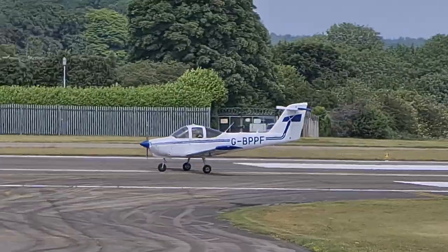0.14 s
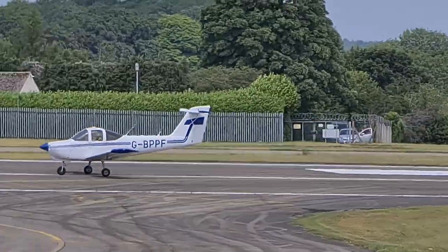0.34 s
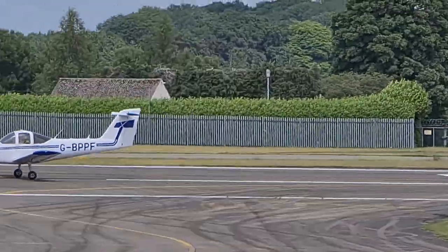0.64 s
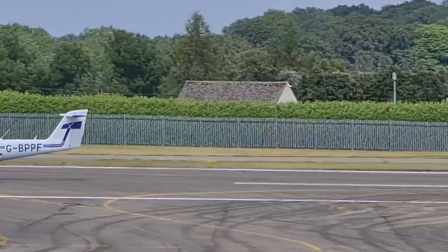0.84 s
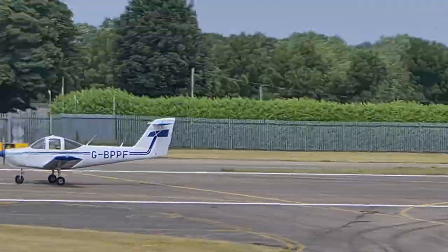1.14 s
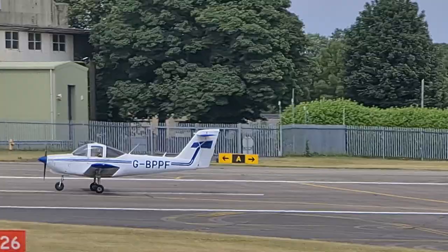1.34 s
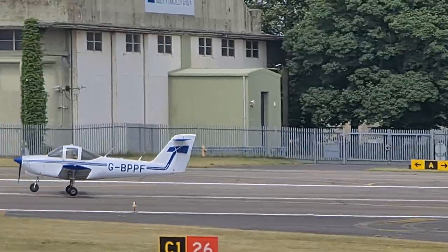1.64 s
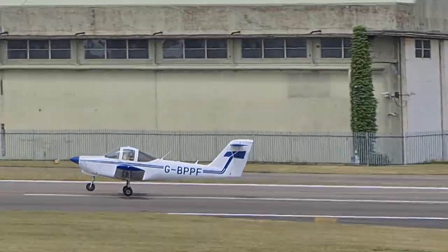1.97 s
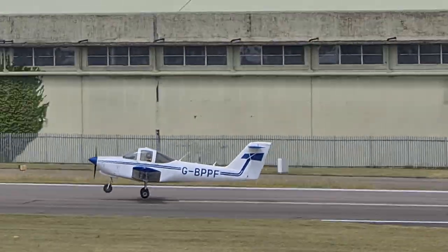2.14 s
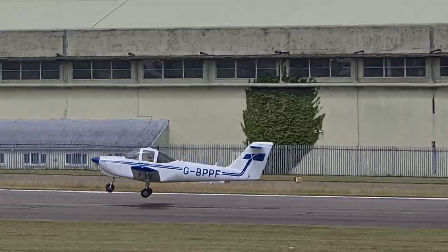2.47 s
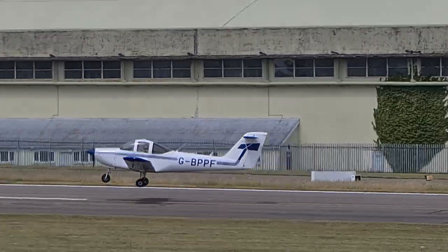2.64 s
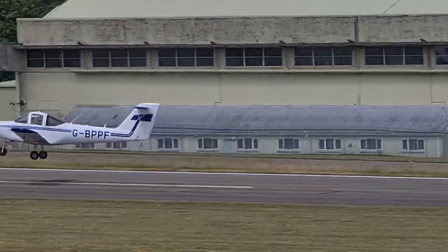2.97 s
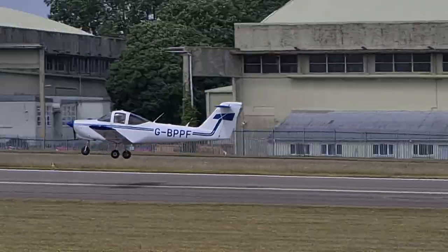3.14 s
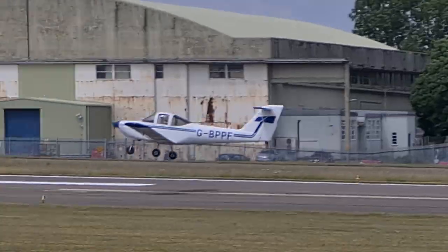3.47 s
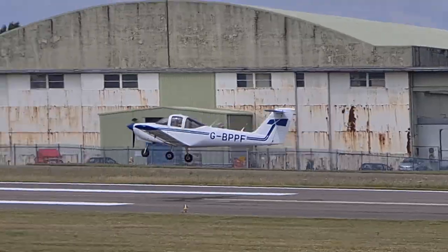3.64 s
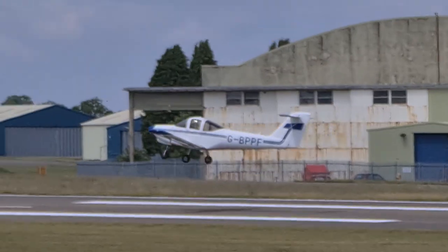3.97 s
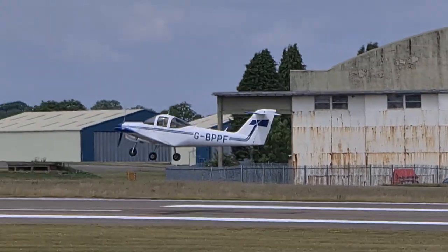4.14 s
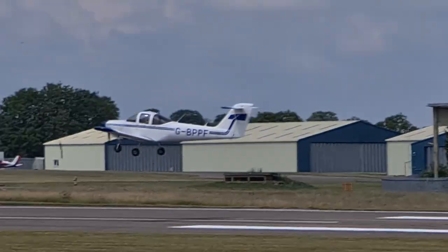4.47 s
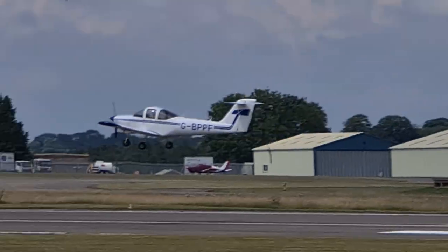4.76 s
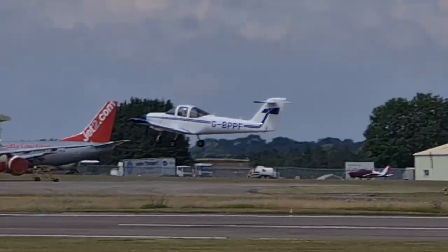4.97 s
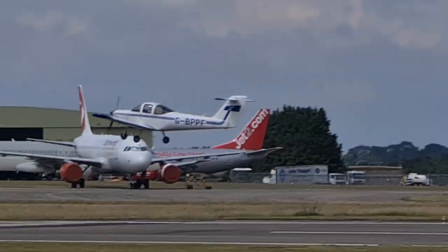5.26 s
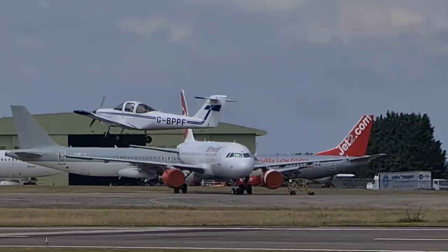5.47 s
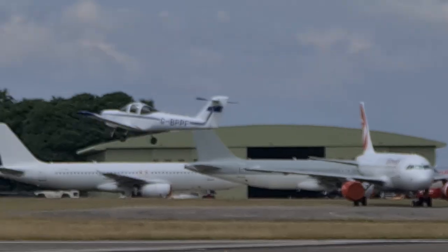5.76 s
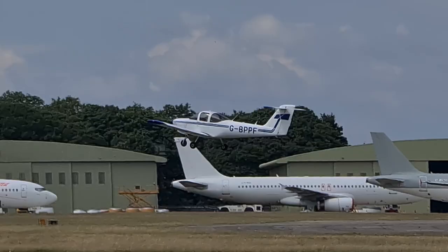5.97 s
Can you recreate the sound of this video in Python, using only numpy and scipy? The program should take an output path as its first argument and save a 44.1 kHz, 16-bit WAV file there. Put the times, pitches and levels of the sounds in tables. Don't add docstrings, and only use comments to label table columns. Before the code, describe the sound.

Across an open airfield, a small single-engine propeller plane passes at full power. Its low, fast-throbbing drone begins with an airy forward swish, fills out, then slides slightly down in pitch as the tail turns toward the listener. Broadband roar and puffing exhaust hiss grow. One outdoor microphone in the grass catches gusts and low thumps throughout, the hardest near the end, plus tiny handling ticks and a barely audible distant bird.

```python
import sys
import numpy as np
from scipy import signal
from scipy.io import wavfile

SR = 44100
rng = np.random.default_rng(int(sys.argv[2]) if len(sys.argv) > 2 else 0)


def master(y):
    cut = np.clip(np.atleast_2d(y).T, -1, 1)
    pcm = np.round(cut * 32767)
    wavfile.write(sys.argv[1], SR, pcm.astype(np.int16))


def volts_from_decibels(level):
    exponent = np.asarray(level, float) / 20
    return 10 ** exponent


N = 269010
TIME = np.arange(N) / SR

# start_s, gain_db
EXHAUST_OPENNESS = [(0, 4.5), (.42, 6), (.52, 3), (.8, 0), (1.25, 0.5), (1.45, -2), (2.55, -5), (3.15, -1),
                    (3.37, -6), (3.55, -1.5), (3.77, -4), (3.92, 1.5), (4.75, 3), (5.1, 5.5), (5.32, 6),
                    (5.4, 11.5), (5.7, 11), (5.9, 5.5)]


def rms_one(x):
    return x / np.sqrt(np.mean(x ** 2) + 1e-20)


def in_time(rows):
    s, *columns = np.transpose(rows)
    return [np.interp(TIME, s, c) for c in columns]


def bells(rows):
    return sum(height * np.exp(-((TIME - s) / length) ** 2) for s, length, height in rows)


def drift(rate):
    r = np.exp(-80 * np.pi * rate / SR)
    coarse = rng.standard_normal(N // 40 + 2002)
    slow = signal.lfilter([1], [1, -2 * r, r * r], coarse)[2000:]
    return np.interp(np.arange(N) / 40, np.arange(len(slow)), rms_one(slow))


def band(x, low_hz, high_hz, order=2):
    return signal.sosfilt(signal.butter(order, [low_hz, high_hz], "band", fs=SR, output="sos"), x)


def banded_noise(spectrum, shared_db, own_db, rate, tilt_db=0):
    hz, level_db = np.transpose(spectrum)
    edges = hz[0] * 2 ** np.arange(0, np.log2(hz[-1] / hz[0]) + .2, 1 / 3)
    white = rng.standard_normal((2, N + SR))
    together, out = drift(rate), 0
    for k, (low, high) in enumerate(zip(edges, edges[1:])):
        centre_db = np.interp(np.log(low * high) / 2, np.log(hz), level_db)
        centre_db = centre_db + tilt_db * np.log2(low / hz[2])
        flicker_db = shared_db * together + own_db * drift(rate)
        out = out + volts_from_decibels(centre_db + flicker_db) * band(white[k % 2], low, high)[SR:]
    return rms_one(out)


def propeller(phase):
    # start_s, level_db, sharpness_db
    blade_tone = [(0, -29.5, -8), (.25, -28.5, -4.5), (.6, -25, -4), (1.0, -23.5, 1), (1.5, -21, -2),
                  (1.9, -20.5, -5.5), (2.7, -20.5, -7), (3.5, -20, -11), (4.05, -19.7, -10),
                  (4.4, -21, -10), (5.3, -21.5, -8), (6.1, -23, -0.5)]
    # start_s, length_s, gain_db
    ground_echo = [
        (1.0, 0.1, 3),
        (3.05, 0.18, -3.5),
        (3.75, 0.33, 5),
        (5.1, 0.25, -10),
        (5.9, 0.31, -7.5),
    ]
    # multiple, level_db against the upper level, lag_rad
    upper_orders = [(3, 1, .9), (4, 0, .9), (5, -6, .6), (6, -12, -1.5), (1.5, -9, 0)]
    first_db, sharp_db = in_time(blade_tone)
    second_db = first_db - 11 + sharp_db + bells(ground_echo)
    upper_db = first_db - 21.5 + sharp_db
    out = volts_from_decibels(first_db + 0.13 * drift(2.7)) * np.cos(phase)
    out += volts_from_decibels(second_db + 0.36 * drift(7.5)) * np.cos(2 * phase - .6)
    for multiple, level_db, lag_rad in upper_orders:
        out += volts_from_decibels(upper_db + level_db + drift(5.5)) * np.cos(multiple * phase - lag_rad)
    return np.sqrt(2) * out


def exhaust(phase):
    # start_s, depth_db
    pulsing = [(0, .3), (1, .8), (2.2, 1.5), (2.8, 4.5), (4, 4), (5, 2.5), (6.1, 2.5)]
    # start_s, length_s, tilt_db_per_octave
    clearings = [
        (1.34, .035, 2.5),
        (2.07, .05, 3),
        (3.05, .03, 2),
        (3.2, .04, 7),
        (3.55, .05, 3),
        (3.78, .05, 3),
        (3.93, .04, 2),
        (5.12, .05, 4),
    ]
    # start_s, tilt_db_per_octave
    viewing_tilt = [(0, 1.5), (.45, 2.5), (1, -1), (2, 0.5), (3, -1.5), (4, -2), (5, -1), (5.5, -6.5),
                    (6.1, 2.5)]
    # start_s, share_above_edge_db, loss_under_edge_db
    top_share = [(0, -25, -4), (.43, -28.5, -6), (.5, -31.5, -10), (1.9, -34, -9.5), (2.3, -32, -3),
                 (2.8, -34, -11.5), (3.6, -35, -7), (4.42, -48.5, -4.5), (4.55, -29, -3), (5.1, -26, -5.5),
                 (5.7, -30, -4), (6.1, -23.5, -4)]
    # pitch_hz, level_db per Hz
    hiss_spectrum = [(1700, -7.5), (2100, -2.5), (2700, -3), (3500, -8), (4500, -10.5), (5200, -14.5),
                     (6200, -16.5), (7400, -26)]
    # pitch_hz, level_db per Hz
    air_spectrum = [(6900, 0), (8000, -3), (9000, -6), (10000, -8), (12000, -11), (14000, -20)]

    hiss_db = -53.5 + in_time(EXHAUST_OPENNESS)[0]
    share_db, edge_db = in_time(top_share)
    depth_db, = in_time(pulsing)
    clear = bells(clearings)
    tilt_db = in_time(viewing_tilt)[0] + clear

    puff = np.exp(1.6 * (np.cos(phase + .45) - 1)) * 1.9 - .8
    uneven = 1 + .2 * np.cos(phase / 2) + .3 * drift(40)
    gate = volts_from_decibels((depth_db + .5 * clear) * puff * uneven)

    hiss = banded_noise(hiss_spectrum, shared_db=0.5, own_db=1.13, rate=13, tilt_db=tilt_db)
    hiss = volts_from_decibels(hiss_db + 0.23 * clear) * gate * hiss
    edge = signal.sosfiltfilt(signal.butter(8, 6200, "high", fs=SR, output="sos"), hiss)
    hiss = hiss + (volts_from_decibels(np.minimum(edge_db + 0.92 * clear, 2)) - 1) * edge

    air = banded_noise(air_spectrum, shared_db=.4, own_db=.5, rate=12)
    air = volts_from_decibels(hiss_db + share_db + 1.3 * clear) * np.sqrt(gate) * air
    steep = signal.ellip(10, .5, 40, 7000, fs=SR, output="sos")
    return signal.sosfilt(steep, hiss) + stepped_top(air, leak_db=-6)


def stepped_top(x, leak_db):
    # start_s, top_hz
    reach = [
        (0, 8100),
        (4.55, 9000),
        (5.08, 10000),
        (5.9, 11500),
    ]
    out = np.zeros(N)
    for s, top_hz in reach:
        low_pass = signal.ellip(6, .2, 25, top_hz, fs=SR, output="sos")
        i = round(s * SR)
        out[i:] = signal.sosfiltfilt(low_pass, x)[i:]
    return out + volts_from_decibels(leak_db) * (x - out)


def roar():
    # start_s, roar_gain_db, ground_reinforced_pitch_hz
    tail_turn = [(0, 3, 890), (.3, 1.5, 898), (1.0, 0, 935), (1.9, 0, 810), (2.8, 0, 865), (3.3, 5, 834),
                 (3.7, 3, 898), (4.45, 10, 1007), (5.2, 12, 950), (5.8, 10, 977), (6.1, 13, 972)]
    # start_s, level_db
    forward_swish = [(0, -44), (.25, -44.5), (.5, -48), (.8, -50), (1.15, -50), (1.4, -60), (1.8, -75),
                     (6.1, -80)]
    # pitch_hz, level_db per Hz
    rumble_spectrum = [(150, -11.5), (200, 0), (300, -4.5), (450, -2.5), (620, -4.5), (800, -8),
                       (1000, -29.5)]
    # pitch_hz, level_db per Hz
    shoulder_spectrum = [(1000, -8.5), (1250, 3), (1500, -5), (1900, -5), (2400, -18.5), (3000, -19.5)]

    tail_db, hump_hz = in_time(tail_turn)
    open_db, = in_time(EXHAUST_OPENNESS)
    rumble_db = -44.5 + 0.32 * tail_db + 0.22 * open_db
    rumble_db += 4 * np.maximum(TIME - 4.75, 0)
    rumble = volts_from_decibels(rumble_db) * banded_noise(rumble_spectrum, shared_db=0.76, own_db=0.96, rate=6.1)

    boom_hz = 255.5
    boom = rms_one(band(rng.standard_normal(N), low_hz=boom_hz / 1.12, high_hz=boom_hz * 1.12))
    boom = volts_from_decibels(-56.5 + tail_db) * boom

    hump_hz = hump_hz - 45 * np.exp(-TIME / 2.0)
    hump = volts_from_decibels(-44.5 + tail_db + 0.14 * drift(24)) * moving_hump(hump_hz, width_hz=328)
    shoulder_db = -50 + 0.57 * tail_db + .4 * open_db
    shoulder = volts_from_decibels(shoulder_db) * banded_noise(shoulder_spectrum, shared_db=1.5, own_db=1.1, rate=4.7)
    swish = rms_one(band(rng.standard_normal(N), low_hz=1170, high_hz=1550))
    swish = volts_from_decibels(in_time(forward_swish)[0]) * swish
    return rumble + boom + hump + shoulder + swish


def moving_hump(centre_hz, width_hz):
    out, state = rng.standard_normal(N), np.zeros(2)
    r = np.exp(-np.pi * width_hz / SR)
    for i in range(0, N, 512):
        poles = [1, -2 * r * np.cos(2 * np.pi * centre_hz[i] / SR), r * r]
        out[i:i + 512], state = signal.lfilter([1, 0, -1], poles, out[i:i + 512], zi=state)
    return rms_one(band(out, low_hz=605, high_hz=1324))


def wind():
    # start_s, length_s, peak_db
    gust_times = [(0, 0.047, -38), (0.226, 0.19, -41), (0.516, 0.092, -41), (.82, 0.11, -43),
                  (1.2, 0.046, -41), (1.668, 0.29, -33.5), (2.192, 0.081, -42.5), (2.5, .1, -35.5),
                  (2.72, .05, -46), (3.004, 0.24, -35.5), (3.695, 0.049, -37), (4.09, 0.13, -34.5),
                  (4.4, 0.045, -43), (4.695, 0.2, -34.5), (5.153, 0.38, -34), (5.59, .06, -30.5),
                  (5.972, 0.1, -25.5)]
    # start_s, peak_db, push (1) or pull (-1)
    thumps = [
        (1.548, -26, -1),
        (1.971, -27, 1),
        (2.968, -24, 1),
        (4.127, -25, 1),
        (5.173, -25, 1),
        (5.512, -23, 1),
        (5.874, -16, 1),
    ]
    # pitch_hz, level_db per Hz
    buffet_spectrum = [(16, -24), (30, -17.5), (45, -4.5), (62, -3.5), (90, -4.5), (130, -8.5),
                       (200, -24.5), (320, -32)]
    gusts = bells([(s, length, volts_from_decibels(peak_db)) for s, length, peak_db in gust_times])
    breeze = volts_from_decibels(-49.5 + 2.08 * TIME)
    swings = banded_noise(buffet_spectrum, shared_db=1.4, own_db=1.2, rate=12)
    out = (breeze + gusts) * 2 * np.tanh(swings / 2)
    for s, peak_db, push in thumps:
        after = TIME - s
        out += push * volts_from_decibels(peak_db) * np.exp(-(after / .018) ** 2) * np.cos(2 * np.pi * 76 * after)
    return out


def ticks():
    # start_s, peak_db
    tick_times = [
        (0, -52),
        (.323, -64),
        (1.168, -74),
        (1.34, -70),
        (2.05, -74),
        (2.854, -72),
        (3.57, -72),
        (3.63, -72),
        (4.56, -70),
    ]
    out, after = np.zeros(N), np.arange(400) / SR
    for s, peak_db in tick_times:
        i = round(s * SR)
        out[i:i + 400] = volts_from_decibels(peak_db + 4) * rng.standard_normal(400) * np.exp(-after / .002)
    return band(out + 1e-18, 5000, 14000)


def chirps():
    # start_s, end_s, start_hz, end_hz, level_db
    calls = [
        (0, .14, 10900, 11600, -85),
        (4.56, 5.15, 8800, 8950, -85),
    ]
    out = np.zeros(N)
    for start, end, from_hz, to_hz, level_db in calls:
        progress = np.clip((TIME - start) / (end - start), 0, 1)
        shape = np.sqrt(np.clip(np.sin(np.pi * progress), 0, 1))
        pitch_hz = np.interp(TIME, [start, end], [from_hz, to_hz]) + 45 * drift(30)
        whistle = np.sin(2 * np.pi * np.cumsum(pitch_hz) / SR)
        out += volts_from_decibels(level_db + 3 * drift(15)) * shape * whistle
    return out


def scene():
    # start_s, rate_hz
    blade_rate = [(0.0, 82.62), (0.5, 81.67), (1.0, 81.0), (1.5, 79.96), (2.0, 79.64), (2.5, 79.32),
                  (3.0, 79.04), (3.5, 78.52), (4.0, 78.16), (4.5, 77.61), (5.0, 77.1), (5.5, 76.68),
                  (6.1, 76.58)]
    rate_hz, = in_time(blade_rate)
    phase = 2 * np.pi * (.437 + np.cumsum(rate_hz) / SR)
    aircraft = propeller(phase) + exhaust(phase) + roar()
    return (aircraft + wind() + ticks() + chirps())[None]


def band_limit(x):
    return signal.sosfilt(signal.butter(12, 15720, fs=SR, output="sos"), x)


def record(dry):
    hiss = volts_from_decibels(-82.5) * rng.standard_normal(dry.shape)
    fade = np.clip((TIME[-1] - TIME) / .004, 0, 1)
    return band_limit((dry + hiss) * fade)


dry = scene()
out = record(dry)
master(out)
```